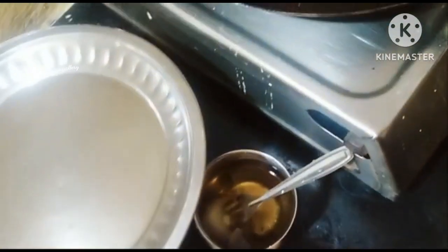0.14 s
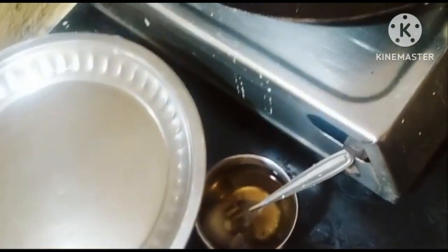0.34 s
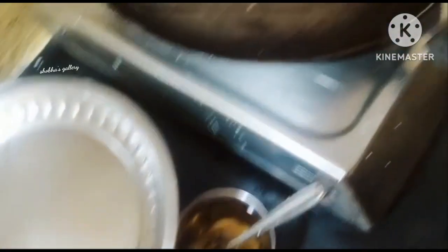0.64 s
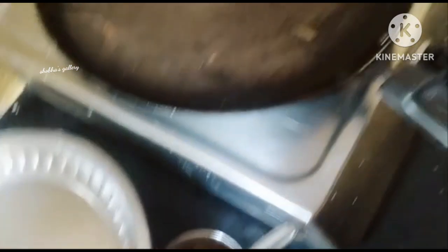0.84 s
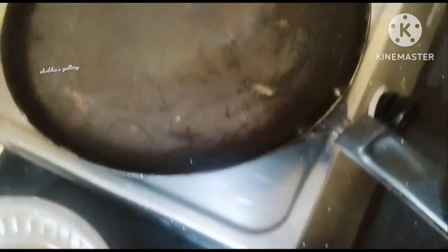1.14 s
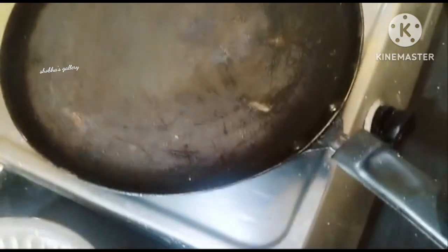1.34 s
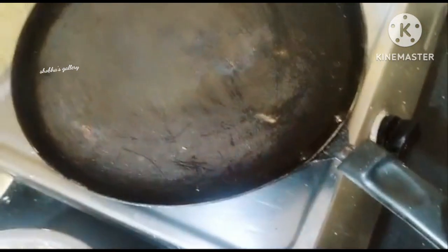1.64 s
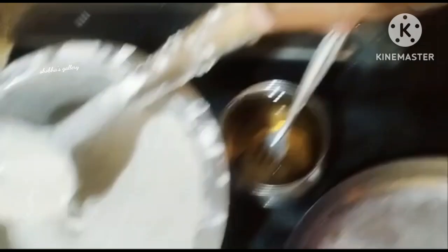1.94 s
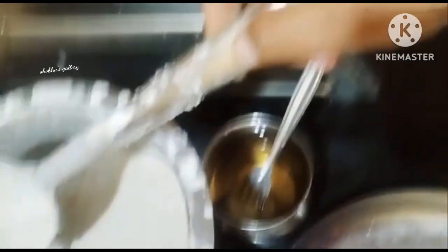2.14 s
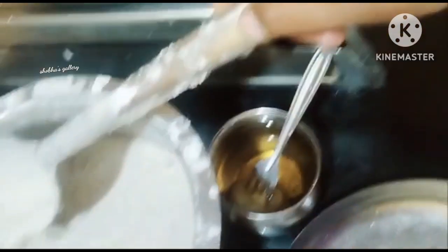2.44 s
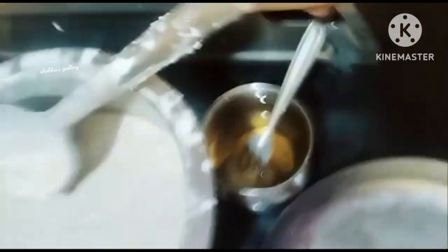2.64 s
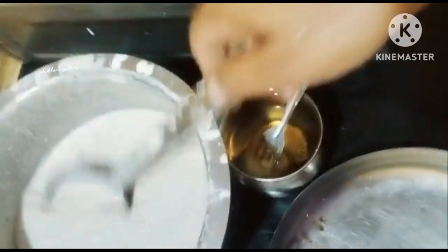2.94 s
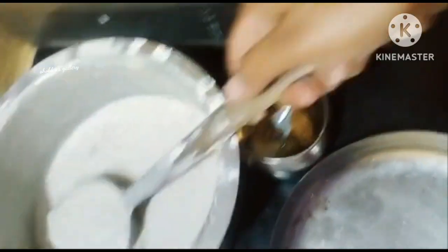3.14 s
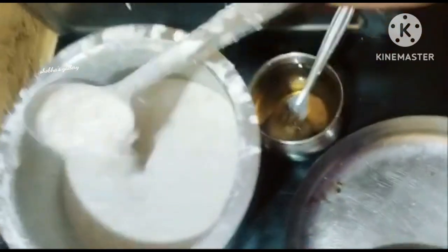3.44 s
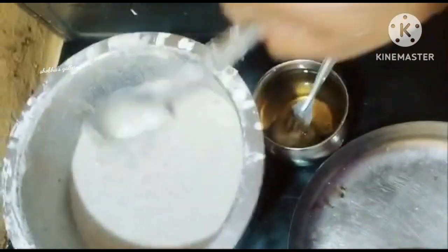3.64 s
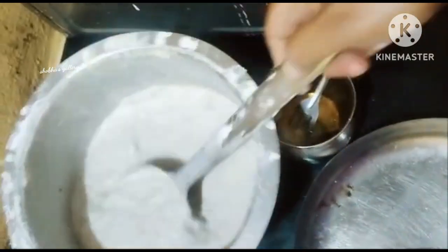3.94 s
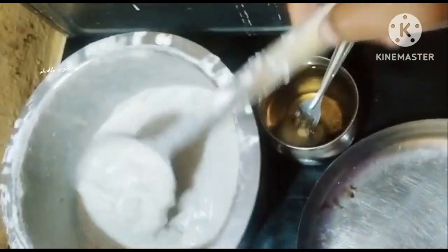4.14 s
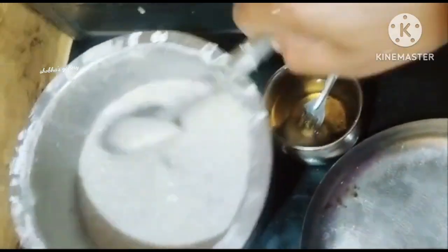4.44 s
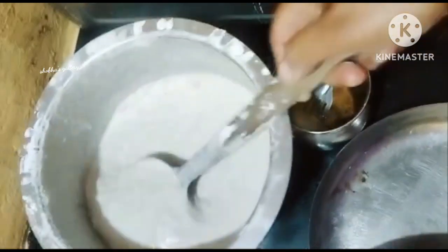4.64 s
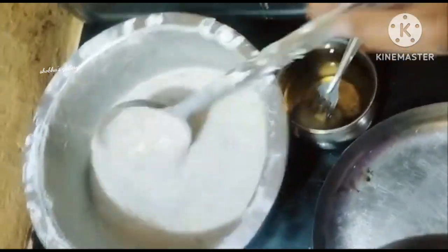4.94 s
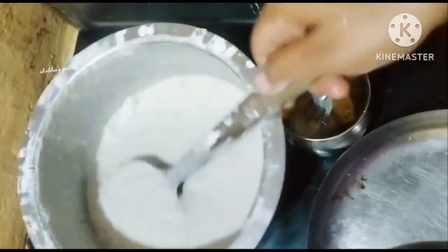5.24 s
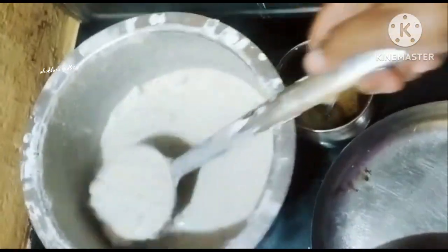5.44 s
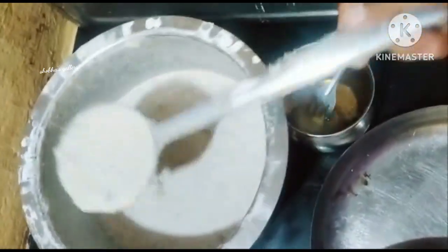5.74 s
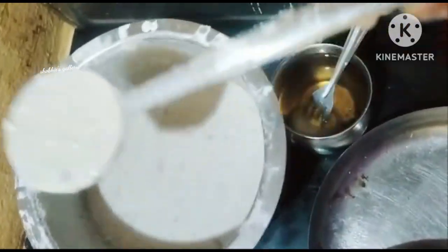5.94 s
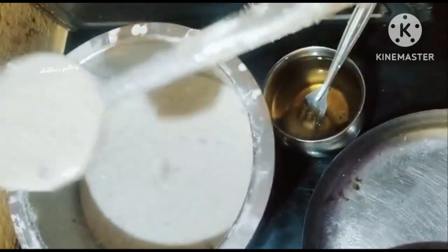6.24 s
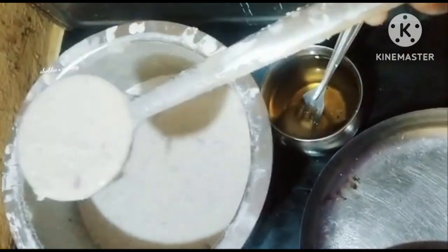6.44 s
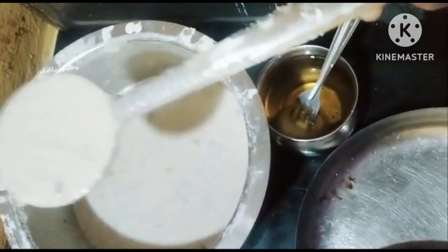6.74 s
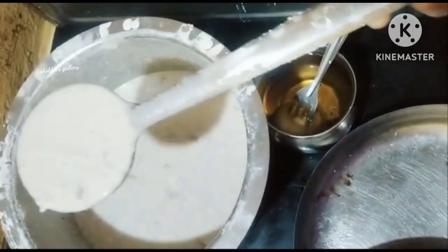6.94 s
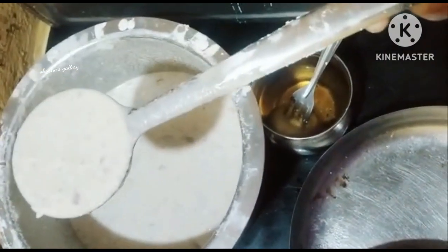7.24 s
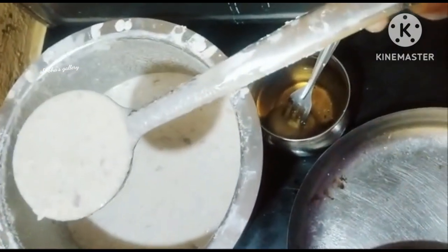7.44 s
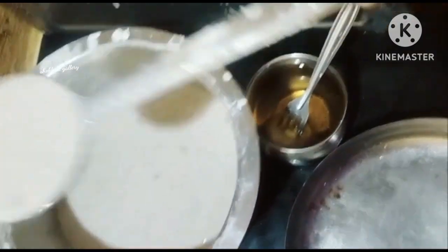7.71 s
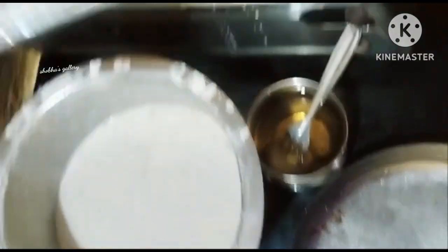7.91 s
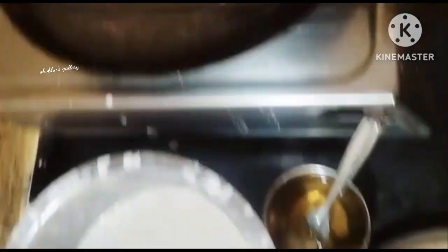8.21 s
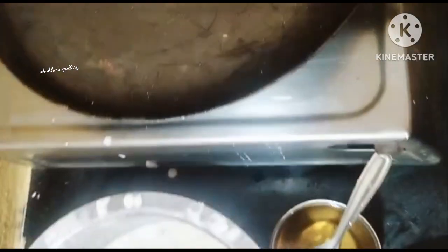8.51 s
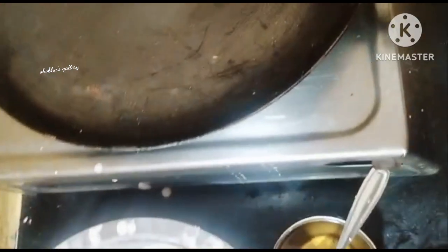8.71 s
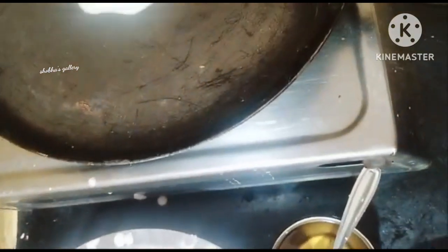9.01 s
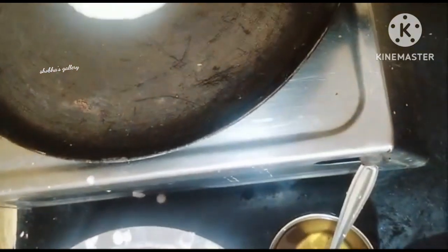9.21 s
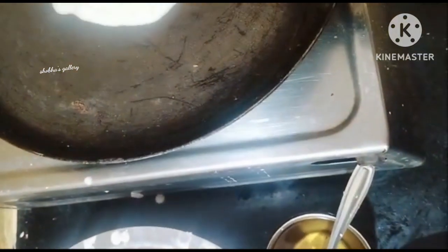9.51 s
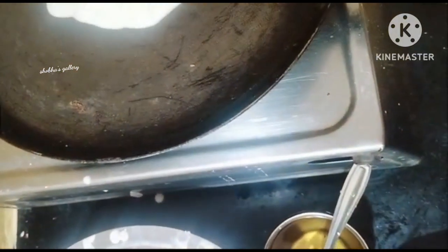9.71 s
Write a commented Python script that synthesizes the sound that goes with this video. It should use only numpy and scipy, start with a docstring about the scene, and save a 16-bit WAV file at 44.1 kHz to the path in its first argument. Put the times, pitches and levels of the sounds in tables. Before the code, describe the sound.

A close microphone in a small, reflective kitchen, with quiet room noise and a faint wavering low hum early on. From 0 to 0.9 seconds there are light metal scrapes and a dry click at 0.3; a soft knock comes at 1.2 and another click at 1.4. At 1.9 a steel ladle clanks hard on a bowl, with a second hit at 2.0 and a scrape. Around 2.7 comes a cluster of dull taps and rubbing. The loudest knock lands at 3.2, followed by a lighter one at 3.4 and small scrapes until 4.3. A faint tap sounds at 4.8, then near quiet with tiny ticks until 6.9. There a soft sizzle begins and gradually grows, brightening slightly past 8. At 9.2 batter lands with a dull wet plop and the frying jumps, becoming still denser and brighter from 9.4 to the end near 9.9.

```python
"""A steel ladle knocks and scrapes on a bowl of batter: short damped modes, a noisy crack, grainy strokes and rubs.
Tiny sharp ticks, of the ladle or perhaps of spitting drops, are short cracks; later the batter sizzles in a hot
pan, as three sizes of bubble noise, swelling as the microphone turns to the pan and fresh batter lands.
Dry clicks sit close to the microphone. The small hard-walled kitchen answers as decaying noise;
a low sine hum wavers under quiet room noise."""
import sys
import numpy as np
from scipy import signal
from scipy.fft import rfft, irfft, next_fast_len
from scipy.io import wavfile
from scipy.ndimage import uniform_filter1d, map_coordinates

SR = 44100
rng = np.random.default_rng(int(sys.argv[2]) if len(sys.argv) > 2 else 0)


def file_out(sig):
    """Save sig as 16-bit WAV at sys.argv[1]."""
    # one column per channel
    cols = np.atleast_2d(sig).T
    # limit, then scale
    lim = np.clip(cols, -1, 1)
    pcm = np.round(lim * 32767).astype(np.int16)
    wavfile.write(sys.argv[1], SR, pcm)


N = 435266

# Blows of the ladle. Each row: start in seconds, low, middle and high ring of the bowl in dB,
# lower and higher ring of the ladle in dB, room answer in dB, pitch of the ladle's modes as a ratio.
KNOCKS = [(1.195, -28.5, -33.5, -26, -33.5, -29.5, -5, 1.09),
          (1.741, -49.5, -47.5, -53, -38, -42, -6.5, 0.99),
          (1.789, -43.5, -42.5, -45, -31.5, -29.5, -9.5, 0.89),
          (1.852, -37, -38, -42, -39.5, -44.5, -3, 0.87), (1.911, -12, -8, -9.5, -13, -8.5, -8, 1.024),
          (2.007, -21, -21, -13, -25, -12.5, -7, 1.14), (2.681, -32.5, -47, -48, -52, -60, -4, 0.97),
          (2.709, -33.5, -38, -41.5, -54, -58, -4.5, 0.98), (2.753, -33, -43, -43, -48, -58, -7, .9),
          (2.791, -33, -40, -37, -46, -58.5, -5, 1), (3.229, -10, -1.5, -12.5, -12, -14.5, -7.5, 1),
          (3.385, -23, -27, -19.5, -35.5, -32.5, -7.5, 1.08), (3.651, -44.5, -53, -38, -54, -57, -4, 1.05),
          (3.746, -60, -58, -43.5, -50, -51, -9, 1), (3.951, -45.5, -40, -34.5, -49, -63, 4, 0.89),
          (4.803, -49.5, -51, -41.5, -39, -49.5, -1, 1.1)]
# Damped modes of ladle and bowl. Each row: frequency in Hz, relative level in dB, t60 in seconds.
STEEL_MODES = [(300, -22, 0.047), (660, -3, 0.022), (870, -2.5, 0.026), (1306, -0.5, 0.014),
               (2330, -2, 0.023), (2616, -0.5, .02), (3090, -5.5, 0.011), (3624, 5.5, 0.016),
               (4370, -11, 0.02), (5670, -9.5, 0.017), (8200, -7, 0.014)]
# Lines that linger after a knock. Each row: frequency in Hz, relative level in dB, t60 in seconds.
LINGERING_MODES = [(456, -7.5, 0.41), (640, -4.5, 0.21), (760, -5.5, 0.29), (836.2, -5.5, 0.26),
                   (868, 0, 0.19), (1330, -8, 0.29), (8250, -3, .2)]
# Centres of the mode groups, bowl then ladle. Each entry: frequency in Hz.
BOWL_HZ = [640, 870, 1350]
LADLE_HZ = [2450, 3500, 7000]
GAP_HZ, GAP_DB = 1700, -6.5  # few modes lie between bowl and ladle
TOP_DB, TOP_GROWS = -27.5, 0.66  # the top modes: offset, and dB gained per dB of the higher ring
TREBLE_HZ = 5460

# Ladle strokes along the bowl. Each row: start in seconds, length in seconds, dull rub in dB,
# bright rasp in dB, treble of the rasp in dB relative to it, loss along the stroke in dB.
STROKES = [(0, 0.34, -72, -73, 0.5, 7.5), (0.3, 0.14, -60.5, -56, 4, -2), (.47, 0.37, -68.5, -66, -1, 5),
           (.746, 0.078, -63, -56, 6, 0.5), (1.724, 0.11, -57.5, -53, -0.5, 3),
           (2.008, 0.24, -42.5, -43.5, -3, 22), (2.676, 0.37, -53, -65, 0, 11.5),
           (3.07, 0.18, -60.5, -67, -6.5, 5.5), (3.395, 0.062, -45.5, -68, -4.5, 3.5),
           (3.502, 0.19, -56.5, -72.5, 2.5, -2.5), (3.938, 0.11, -53, -48, -9, -1.5),
           (4.055, 0.22, -52, -52, 0, 15)]
# Colours of the dull rub and the bright rasp. Each row: frequency in Hz, relative level in dB per Hz.
RUB_COLOUR = [(88, -51), (150, -19), (409, -14.5), (449, -4), (524, -14.5), (650, -0.5), (735, -5.5),
              (1320, -9), (4540, -30.5), (6000, -38.5), (13200, -120)]
RASP_COLOUR = [(590, -42.5), (1000, -6), (2050, 0), (2550, -8.5), (4650, -9.5), (5400, -19.5),
               (6800, -13.5), (9730, -27), (14600, -24), (15800, -29)]
STROKE_RISE_S, STROKE_FALL_DB_PER_S = 0.0094, 331

# Rough narrow bands, the rubbed bowl singing and, last, the pan under the poured batter.
# Each row: start in seconds, length in seconds, first and last pitch in Hz, level in dB.
SINGS = [(0, 0.34, 950, 1566, -66.5), (.75, 0.108, 2079, 1950, -60), (2.68, 0.25, 680, 643, -48),
         (3.061, 0.112, 934, 980, -56), (3.392, 0.12, 1320, 1350, -52), (3.723, 0.06, 4000, 4050, -64),
         (3.948, 0.137, 1500, 1300, -50), (9.202, 0.19, 1300, 1487, -51.5), (9.24, 0.16, 456, 479, -58.5)]
SING_WIDTH, GLIDE_SHARE = .17, .3  # noise knots per cycle; time constant of the glide over the length

# Dry clicks close to the microphone, falling in pitch towards 250 Hz.
# Each row: start in seconds, level in dB, height of the sweep above 250 Hz in Hz, its halving time in seconds.
CLICKS = [(0.334, -39, 1327, 0.0029), (1.3995, -36, 3620, 0.0009)]

# Tiny sharp ticks: some beside the ladle's knocks, later ones perhaps drops spitting.
# Each row: start in seconds, level in dB, treble level in dB.
TICKS = [(1.83, -55.5, -57), (1.861, -50, -52), (2.5424, -59, -66), (3.6885, -59, -68), (4.798, -57, -57),
         (4.937, -65, -75), (5.7325, -52, -66.5), (6.572, -47.5, -56.5), (6.8002, -55, -58.5),
         (6.879, -47, -52.5)]

# Colours of large, middling and small bubbles. Each row: frequency in Hz, relative level in dB per Hz.
DEEP_COLOUR = [(210, -36), (350, -42), (378, -5), (674, -3.5), (737, 4.5), (1600, -7.5), (2080, -1),
               (3520, -120)]
FIZZ_COLOUR = [(590, -26), (1000, 1.5), (1180, -6.5), (1390, 0.5), (2350, -1), (2860, 1), (3590, 3.5),
               (4520, 3), (5920, -5.5), (7140, 0), (9160, -8), (12000, -10.5), (15600, -43)]
HISS_COLOUR = [(5290, -15.5), (11500, -9), (14400, 6), (15200, 1), (15900, -11.5)]
FRY_START_S, FRY_FULL_S = 6.891, 1.5  # first contact, and the time from it until the growth ends
# Frying layers. Each entry, for deep, fizz, hiss: level at full growth in dB; growth in dB per decade of time.
FRY_DB = [-51.5, -46, -51]
FRY_DB_PER_DECADE = [7.5, 11.5, 14]
DEEP_FADES_DB_PER_S = 6.5  # the large bubbles thin out as the batter sets
# The frying swells, as the microphone turns to the pan and fresh batter meets it.
# Each row: start in seconds, rise in seconds, dB added to deep, to fizz and to hiss.
SURGES = [(8.1, .35, -3, -0.23, 2), (9.175, 0.0125, 12.5, 0.64, 0.2), (9.41, 0.13, 1, 3, 5)]
# Resonances of the pan. Each row: centre in Hz, width in Hz, relative level in dB.
PAN = [(916, 107, -2), (2050, 180, -2), (2580, 210, 1), (3458, 130, -1), (4020, 140, -1.5)]
POPS_PER_S, POPS_DB, POPS_SPREAD_DB = 500, -3.5, 5  # mean rate; level relative to the fizz; unevenness

# Batter spreading onto bare hot iron. Each row: frequency in Hz, relative level in dB per Hz.
FRESH_COLOUR = [(1050, -20), (1400, -1), (3500, 0), (5500, -9), (9000, -27.5)]
FRESH_S, FRESH_RISE_S, FRESH_DB = 9.4, .008, -43.5
# A valley in the treble of the frying drifts as the microphone turns.
# Each row: time in seconds, centre in Hz, depth in dB.
VALLEY = [(7.3, 10500, 1.5), (8.2, 12400, 1), (8.6, 10000, 2), (9.35, 10600, 3.5), (9.55, 10500, -1),
          (9.8, 9800, 3.5)]
VALLEY_WIDTH_HZ = 1300
PLOP_S, PLOP_DB, PLOP_T60_S = 9.172, -50, 0.51  # batter lands on the pan
PLOP_LOW_HZ, PLOP_HIGH_HZ = 187, 790

# Answer of the kitchen walls. Each row: frequency in Hz, t60 in seconds.
KITCHEN = [(200, 0.47), (530, 0.51), (1400, 0.39), (3700, .33), (8500, 0.3), (15000, 0.29)]

# Background. Each row: time in seconds, level of the low room noise in dB, level of the thin hiss in dB.
ROOM = [(0, -69.5, -78), (1.1, -68.5, -76.5), (3.9, -71, -78), (4.6, -71, -75), (5.1, -72, -79),
        (6.15, -71.5, -77.5), (6.55, -71, -67.5), (6.85, -75, -78.5), (9.87, -75.5, -78.5)]
# Colours of low room noise and thin hiss. Each row: frequency in Hz, relative level in dB per Hz.
AIR_COLOUR = [(20, -14), (59, -18.5), (107, -2.5), (305, -13.5), (376, -7), (871, -9), (1190, -13.5),
              (3000, -25), (3900, -52), (6600, -120)]
THIN_COLOUR = [(880, -28), (1500, -3), (2180, -4), (4230, -6), (5860, -13), (15900, -20.5)]
# The loudest swells of the hum. Each row: start in seconds, length in seconds, level in dB before its flutter.
HUM_SWELLS = [(0.473, .25, -66), (1.882, 0.25, -56.5), (2.676, 0.2, -61), (2.948, 0.206, -68),
              (3.228, 0.26, -56.5), (4.704, 0.17, -60), (5.1, 0.098, -59)]
HUM_HZ, HUM_DB, HUM_SWING_DB, HUM_ENDS_S = 112.6, -79, 3, 5.4  # under them it wavers faintly, then stops
# Faint brief tones. Each row: start in seconds, pitch in Hz, length in seconds, level in dB before its flutter.
TONES = [(0.615, 2106, 0.23, -64.5), (1.105, 550, 0.079, -61), (2.61, 1120, 0.083, -64.5),
         (2.809, 452.4, 0.08, -52), (2.988, 451, 0.087, -57), (5.394, 2250, .09, -76),
         (7.26, 482, 0.11, -61)]
# Steady faint lines. Each row: frequency in Hz, level in dB before a 1 dB lift.
DRONE = [(215, -86), (285, -82)]
TOP_HZ = 15520  # band limit of the recorder


def knocks():
    """Each blow swells for two milliseconds, dies in the batter and lives on in the room."""
    out, t = np.zeros(N), np.arange(SR // 2) / SR
    short = t[:SR // 10]
    for s, *blow, wet_db, pitch in KNOCKS:
        colour = struck(*blow)
        shifted = [(hz * pitch ** (GAP_HZ < hz < TREBLE_HZ), db, t60) for hz, db, t60 in STEEL_MODES]
        modes = amp(6.0) * ring(shifted, colour, short, rise=0.0019, spread_db=1.5)
        wide = crack_colour(colour, pitch)
        crack = coloured(rng.standard_normal(len(short)), wide)
        crack = crack * amp(12.5 - 60 * short / .014) * (1 - np.exp(-(short / 0.0015) ** 2))
        add(out, s, modes + crack)
        # the room answers the modes, duller, and the crack
        dulled = coloured(modes, [(1500, 0), (3600, -7)])
        add(out, s, amp(wet_db + 2.0) * signal.fftconvolve(dulled, tail()))
        add(out, s, amp(wet_db + 31.5) * coloured(tail(), wide))
        slosh = 1 + .5 * wobble(40, size=len(t))  # moving batter makes the lines waver
        lingering = ring(LINGERING_MODES, colour, t, rise=0.021, spread_db=1)
        add(out, s, amp(wet_db - 6) * slosh * lingering)
    return out


def struck(*levels_db):
    """(Hz, dB) of the mode groups; the top modes follow the ladle's higher ring."""
    *bowl, lower_db, higher_db = levels_db
    gap_db = (max(bowl[1:]) + lower_db) / 2 + GAP_DB
    top_db = TOP_DB + TOP_GROWS * higher_db
    return list(zip(BOWL_HZ + [GAP_HZ] + LADLE_HZ, [*bowl, gap_db, lower_db, higher_db, top_db]))


def crack_colour(colour, pitch):
    """The countless small modes of thin steel merge into a noisy crack of this wide (Hz, dB) colour."""
    low, high, top = colour[0][1], colour[-2][1], colour[-1][1]
    below = [(100, low - 45), (350, low - 14)]
    above = [(4150 * pitch, high - 6), (4900 * pitch, top), (8300, top + 1.2),
             (10500, top - 14), (14500, top - 12)]
    return below + colour[:-1] + above


def ring(modes, colour, t, rise, spread_db):
    """Damped sines at new strengths and phases."""
    hz, db, t60 = np.transpose(modes)[:, :, None]
    db = db + along(colour, hz) + spread_db * rng.standard_normal(hz.shape)
    sines = np.sin(2 * np.pi * (hz * t + rng.random(hz.shape)))
    return (amp(db - 60 * t / t60) * sines).sum(0) * (1 - np.exp(-(t / rise) ** 2))


def strokes():
    """Steel on steel through batter: grainy noise, dull in the bowl's body and bright at the rim."""
    (rub, rasp, treble), t = np.zeros((3, N)), np.arange(SR // 2) / SR
    for s, length, rub_db, rasp_db, treble_db, loss_db in STROKES:
        fade_db = loss_db * np.clip(t / length, 0, 1)
        fade_db = fade_db + STROKE_FALL_DB_PER_S * np.clip(t - length, 0, None)
        shape = np.clip(t / STROKE_RISE_S, 0, 1) ** 2 * amp(-fade_db)
        add(rub, s, amp(rub_db) * shape)
        add(rasp, s, amp(rasp_db) * shape)
        add(treble, s, amp(rasp_db + treble_db) * shape)
    dull = rush(RUB_COLOUR, patchy_db=3.0, grain_db=1.5, grain_rate=61)
    grit = rush(RASP_COLOUR, patchy_db=2.0, grain_db=1.5, grain_rate=260)
    high = filtered(grit, lambda hz: hz ** 4 / (hz ** 4 + TREBLE_HZ ** 4))
    return rub * dull + rasp * (grit - high) + treble * high


def sings():
    """A gliding band of noise for each row, quick to start and slow to fade."""
    out = np.zeros(N)
    for s, length, first_hz, last_hz, db in SINGS:
        u = np.arange(round(length * SR)) / SR / length
        hz = last_hz + (first_hz - last_hz) * np.exp(-u / GLIDE_SHARE)
        phase = 2 * np.pi * np.cumsum(hz) / SR
        rate = SING_WIDTH * last_hz
        band = wobble(rate, size=len(u)) * np.sin(phase) + wobble(rate, size=len(u)) * np.cos(phase)
        add(out, s, amp(db) * unit(band) * np.clip(u * 10, 0, 1) * np.sqrt(1 - u))
    return out


def clicks():
    """One quick downward sweep each, with no ring."""
    out, t = np.zeros(N), np.arange(SR // 40) / SR
    for s, db, sweep_hz, halving in CLICKS:
        phase = 2 * np.pi * np.cumsum(250 + sweep_hz * 2 ** (-t / halving)) / SR
        shape = np.exp(-(t / (3.5 * halving)) ** 2) * np.clip(t / .001, 0, 1)
        add(out, s, amp(db) * np.sin(phase) * shape)
    return out


def ticks():
    """A tiny sharp tick, of the ladle or a spitting drop, is a short crack with a faint room answer."""
    out, t = np.zeros(N), np.arange(SR // 30) / SR
    for s, db, treble_db in TICKS:
        colour = [(700, db - 29.0), (1800, db), (6000, db), (9000, treble_db), (15000, treble_db)]
        add(out, s, amp(5.0 - 60 * t / 0.014) * coloured(rng.standard_normal(len(t)), colour))
        add(out, s, amp(18.0) * coloured(tail(), colour))
    return out


def frying():
    """Countless steam bubbles burst: three sizes, small ones grainier, surging together; the pan hums along."""
    deep, fizz, hiss = heat()
    surge = amp(0.22 * wobble(12) + 0.52 * wobble(90))
    large = rush(DEEP_COLOUR, patchy_db=1.5, grain_db=2.5, grain_rate=61)
    middling = rush(FIZZ_COLOUR, patchy_db=0.5, grain_db=1.0, grain_rate=500)
    small = rush(HISS_COLOUR, patchy_db=.8, grain_db=2.5, grain_rate=900)
    bursts = amp(POPS_DB) * pops()
    return surge * (deep * (large + pan_hum()) + fizz * (middling + bursts) + hiss * small)


def heat():
    """Gains of deep, fizz and hiss: quick growth at first, ever slower, and a lasting step for each surge."""
    t = np.arange(N) / SR
    since = np.clip(t - FRY_START_S, 0, None)
    decades = np.log10(np.clip(since / FRY_FULL_S, 1e-3, 1))
    db = np.outer(FRY_DB_PER_DECADE, decades) + np.array(FRY_DB)[:, None]
    db = db - np.outer([DEEP_FADES_DB_PER_S, 0, 0], since)
    for s, rise, *added_db in SURGES:
        db = db + np.outer(added_db, np.clip((t - s) / rise, 0, 1))
    return amp(db) * (since > 0)


def pan_hum():
    """Noise through the pan's resonances, rms 1."""
    def resonances(hz):
        return sum(amp(db) * width ** 2 / (width ** 2 + (2 * (hz - centre)) ** 2) for centre, width, db in PAN)
    return unit(filtered(rng.standard_normal(N), resonances))


def pops():
    """Single sharp bursts: scattered impulses of very uneven size, rms 1."""
    size_db = POPS_SPREAD_DB * np.minimum(rng.exponential(size=N), 3.5)
    impulses = (rng.random(N) < POPS_PER_S / SR) * amp(size_db) * rng.choice([-1, 1], size=N)
    return unit(filtered(impulses, lambda hz: amp(along(FIZZ_COLOUR, hz)) + amp(along(HISS_COLOUR, hz))))


def fresh():
    """Batter on bare hot iron: a bright dense sizzle that sets in at once."""
    onset = np.clip((np.arange(N) / SR - FRESH_S) / FRESH_RISE_S, 0, 1)
    return amp(FRESH_DB) * onset * rush(FRESH_COLOUR, patchy_db=1.7, grain_db=1.0, grain_rate=330)


def shaded(x):
    """x with the drifting valley cut into its treble."""
    hz, t, z = signal.stft(x, SR, nperseg=512)
    s, centre, depth_db = np.transpose(VALLEY)
    bell = np.exp(-((hz[:, None] - np.interp(t, s, centre)) / VALLEY_WIDTH_HZ) ** 2)
    return signal.istft(z * amp(-np.interp(t, s, depth_db) * bell), SR, nperseg=512)[1][:N]


def plop():
    """Batter lands: a dull wet puff of decaying noise."""
    out, t = np.zeros(N), np.arange(SR // 2) / SR
    colour = [(PLOP_LOW_HZ / 2, -30), (PLOP_LOW_HZ, -6), (PLOP_HIGH_HZ, 0), (2 * PLOP_HIGH_HZ, -20)]
    puff = unit(coloured(rng.standard_normal(len(t)), colour))
    add(out, PLOP_S, amp(PLOP_DB - 60 * t / PLOP_T60_S) * np.clip(t / 0.0112, 0, 1) * puff)
    return out


def tail():
    """A fresh diffuse answer of the kitchen, energy 1; it builds up over the first walls."""
    hz, t, z = signal.stft(rng.standard_normal(SR // 2), SR, nperseg=256)
    x = signal.istft(z * amp(-60 * t / along(KITCHEN, hz)[:, None]), SR, nperseg=256)[1]
    x = x * np.clip(np.arange(len(x)) / SR / 0.00076, 0, 1)
    return x / np.linalg.norm(x)


def indoors(x, wet_db):
    """A lasting sound with its room answer, which combs the spectrum into fine fixed bands."""
    return x + amp(wet_db) * signal.fftconvolve(x, tail())[:N]


def background():
    """Room noise, a wavering low hum and a few faint, unsteady tones."""
    air, thin = gains(ROOM)
    out = air * rush(AIR_COLOUR, patchy_db=1.2, grain_db=.5, grain_rate=8)
    out = out + thin * rush(THIN_COLOUR, patchy_db=1, grain_db=.5, grain_rate=8)
    t = np.arange(N) / SR
    for hz, db in DRONE:
        out = out + amp(db + 1) * np.sin(2 * np.pi * hz * t + wobble(1.6))
    tones = np.zeros(N)
    for row in TONES:
        swell(*row, tones)
    return out + hum() * amp(5.3 * wobble(30)) + tones * amp(3.8 * wobble(40))


def hum():
    """A low sine with drifting level and phase, and louder swells near its pitch."""
    swells, t = np.zeros(N), np.arange(N) / SR
    for s, length, db in HUM_SWELLS:
        swell(s, HUM_HZ + 3 * rng.standard_normal(), length, db, swells)
    faint = amp(HUM_DB + HUM_SWING_DB * wobble(8.4)) * np.sin(2 * np.pi * HUM_HZ * t + wobble(13))
    return swells + faint * np.clip((HUM_ENDS_S - t) / 0.085, 0, 1)


def swell(s, hz, length, db, track):
    """A tone that fades in and out."""
    t = np.arange(round(length * SR)) / SR
    add(track, s, amp(db) * np.sqrt(np.sin(np.pi * t / length)) * np.sin(2 * np.pi * hz * t))


def rush(spectrum, patchy_db, grain_db, grain_rate):
    """Noise of rms 1 with patches of random gain and a quick grainy flutter."""
    z = signal.stft(rng.standard_normal(N), nperseg=512)[2]
    field = uniform_filter1d(rng.standard_normal(z.shape), size=5, axis=0)  # smooth over frequency
    field = uniform_filter1d(field, size=10, axis=1)  # smooth over time
    x = signal.istft(z * amp(patchy_db * unit(field)), nperseg=512)[1][:N]
    grainy = x * amp(grain_db * wobble(grain_rate))
    return unit(filtered(grainy, lambda hz: amp(along(spectrum, hz))))


def wobble(rate, size=N):
    """A smooth random curve, rate knots a second."""
    knots = rng.standard_normal(int(size * rate / SR) + 4)
    return map_coordinates(knots, [np.arange(size) * rate / SR])


def filtered(x, response):
    """A full-length x times a response of frequency."""
    m = next_fast_len(N + 8192)
    return irfft(rfft(x, m) * response(np.fft.rfftfreq(m, 1 / SR)), m)[..., :N]


def coloured(x, points):
    """A short x through a smooth (Hz, dB) colour."""
    m = 2 * len(x)
    return irfft(rfft(x, m) * amp(along(points, np.fft.rfftfreq(m, 1 / SR))), m)[:len(x)]


def along(points, hz):
    """Reads (Hz, value) points on a log axis."""
    f, v = np.transpose(points)
    return np.interp(np.log(hz + 1), np.log(f + 1), v)


def gains(rows):
    """One gain per sample for each dB column; -140 dB outside the rows."""
    s, *cols = np.transpose(rows)
    return np.array([amp(np.interp(np.arange(N) / SR, s, c, -140, -140)) for c in cols])


def add(track, s, sound):
    """Mixes a sound into the track at s seconds."""
    part = track[round(s * SR):][:len(sound)]
    part += sound[:len(part)]


def amp(db):
    """Amplitude of a level in dB."""
    return 10 ** (np.asarray(db) / 20)


def unit(x):
    """x scaled to rms 1."""
    return x / np.sqrt(np.mean(x ** 2) + 1e-20)


def scene():
    """The ladle and bowl, the pan and the background of one kitchen."""
    sizzle = filtered(shaded(frying() + fresh()), lambda hz: hz ** 2 / (hz ** 2 + 250 ** 2))
    lasting = indoors(strokes() + sings() + plop(), wet_db=-8.5) + indoors(sizzle, wet_db=-9.0)
    return (knocks() + clicks() + ticks() + lasting + background())[None]


def record(dry):
    """The input saturates softly near full scale and keeps nothing above its band limit."""
    held = dry / (1 + np.abs(dry / .95) ** 4) ** .25
    return filtered(held, lambda hz: hz < TOP_HZ)


dry = scene()
out = record(dry)
file_out(out)
```